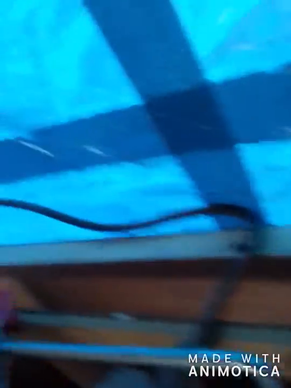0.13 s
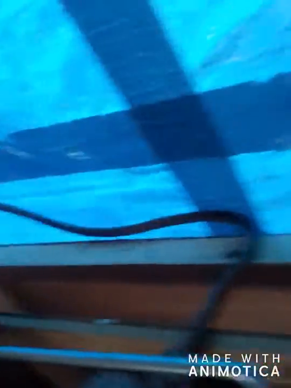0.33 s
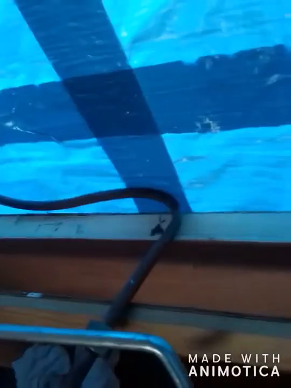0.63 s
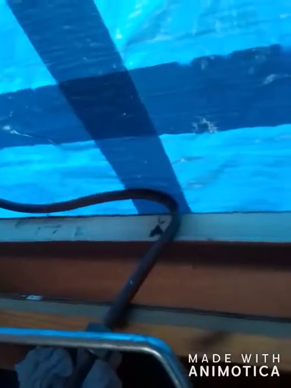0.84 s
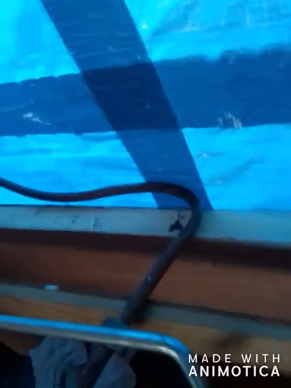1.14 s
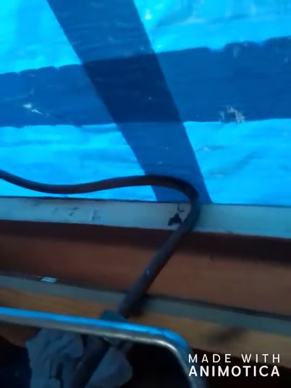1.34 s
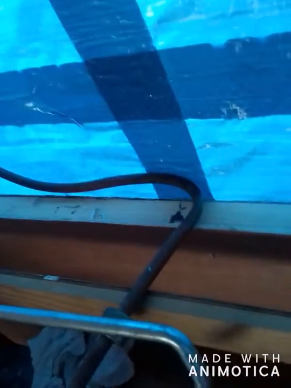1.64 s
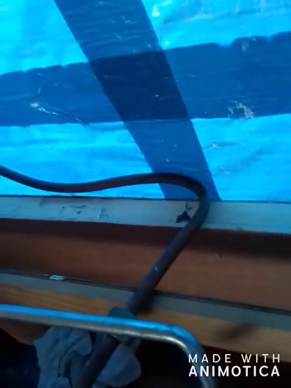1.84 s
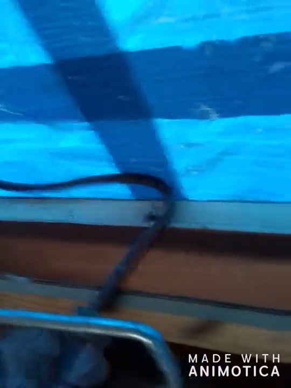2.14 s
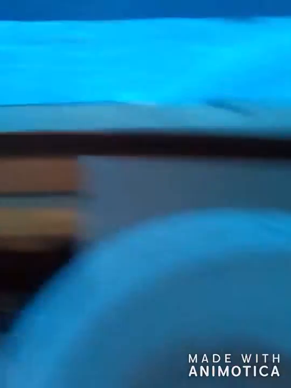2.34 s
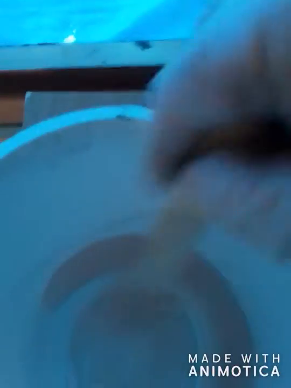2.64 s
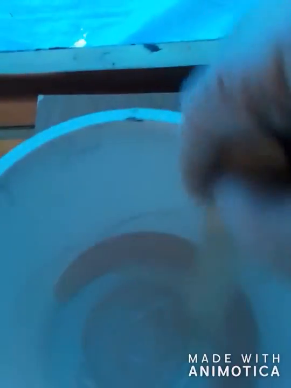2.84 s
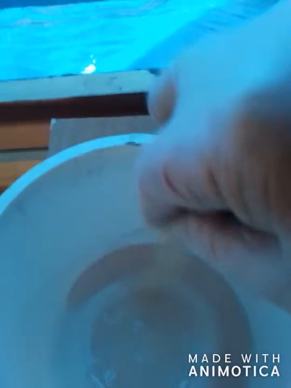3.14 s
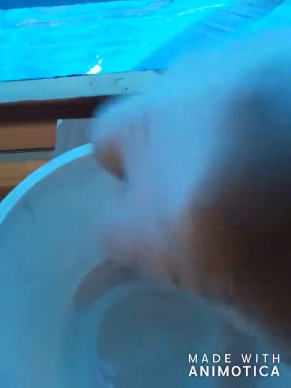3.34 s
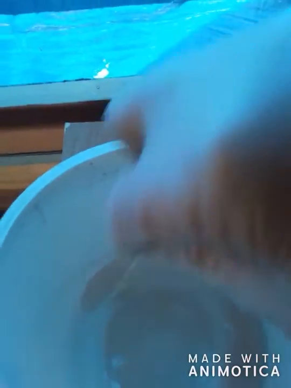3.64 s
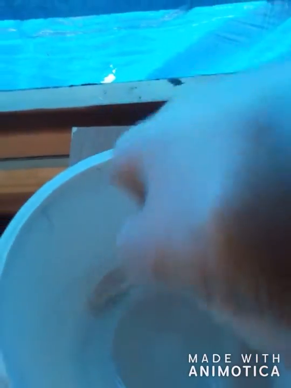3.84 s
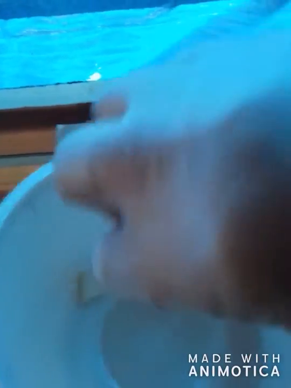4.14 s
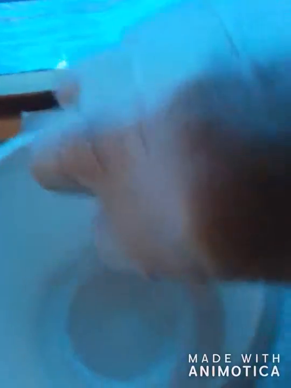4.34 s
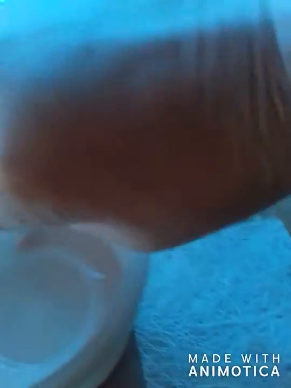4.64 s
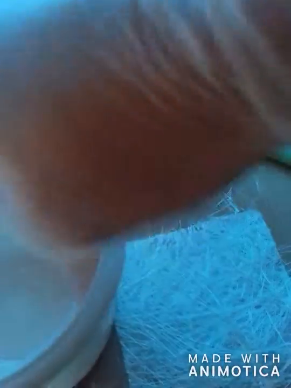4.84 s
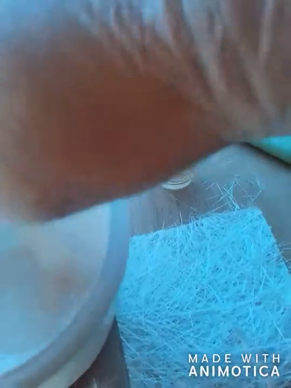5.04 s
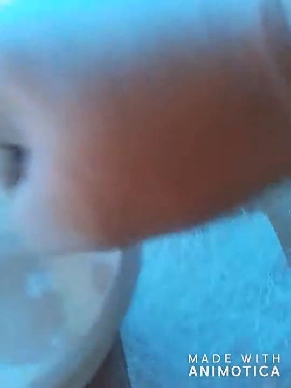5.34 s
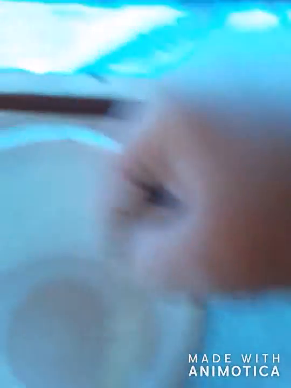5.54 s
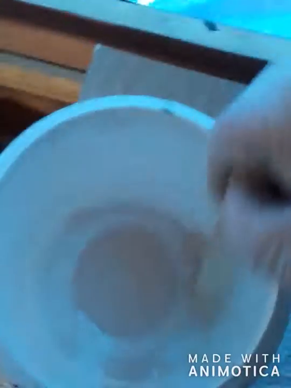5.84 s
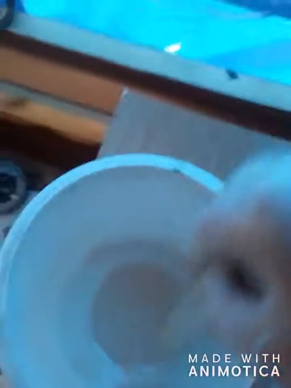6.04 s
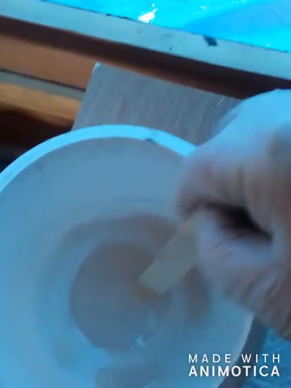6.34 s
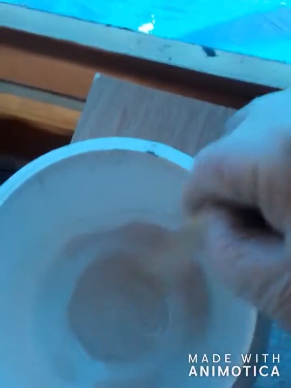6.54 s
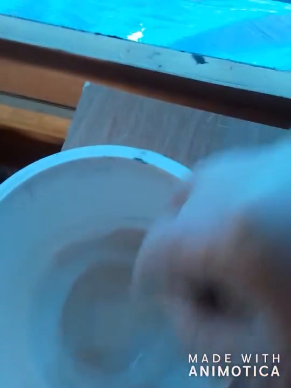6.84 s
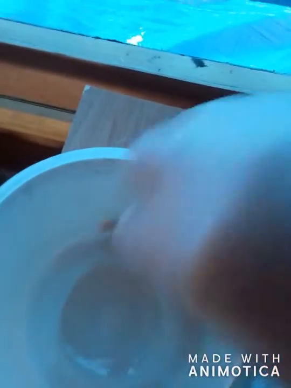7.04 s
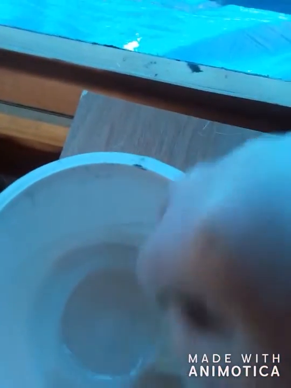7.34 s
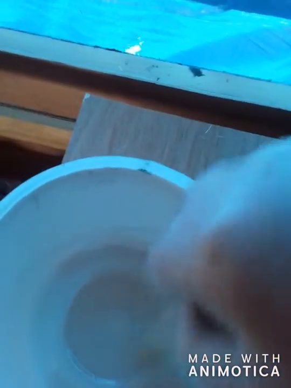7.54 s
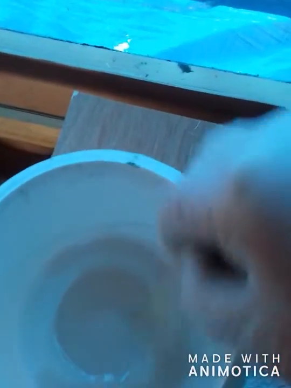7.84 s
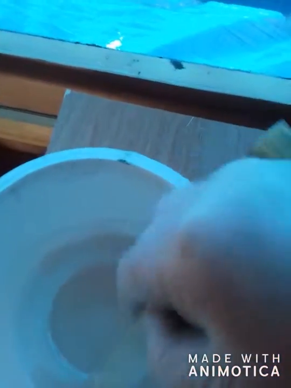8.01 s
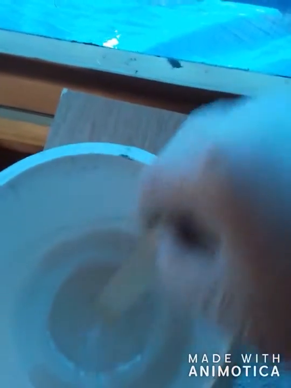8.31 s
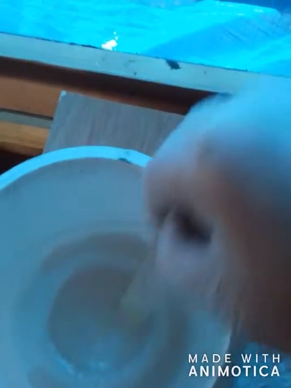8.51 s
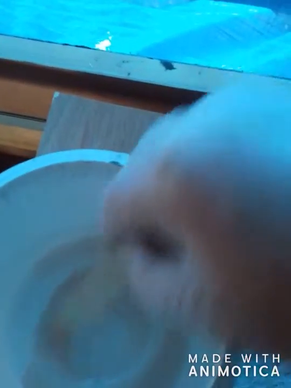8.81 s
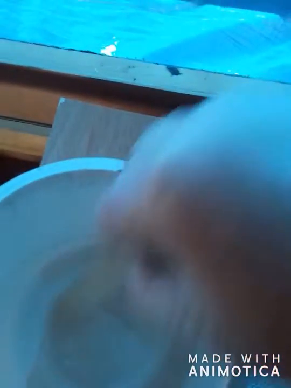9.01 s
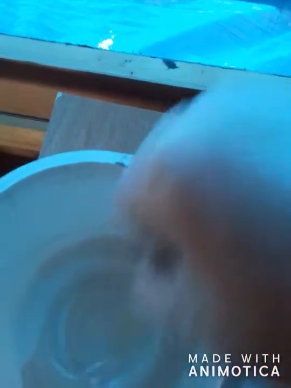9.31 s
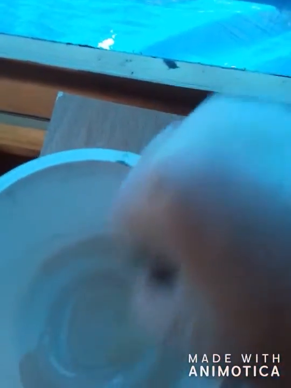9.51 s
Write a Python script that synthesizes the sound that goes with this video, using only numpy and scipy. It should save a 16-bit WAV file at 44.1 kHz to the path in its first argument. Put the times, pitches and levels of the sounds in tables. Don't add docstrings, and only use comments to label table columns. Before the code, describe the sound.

Stirring resin under a tarp: quick uneven clusters of woody taps on thin plastic, with gritty scraping and small wobbles on the bench. A brief lull, then the stick works in a deeper bucket, giving mostly gentler thuds and ticks, low rubbing rumble and soft wet slaps, with a few firmer clacks. The sound is dry and close, treble muffled, with faint hiss and quiet air behind.

```python
import sys
import numpy as np
from scipy import signal
from scipy.io import wavfile
from scipy.ndimage import uniform_filter1d

SR = 44100
rng = np.random.default_rng(int(sys.argv[2]) if len(sys.argv) > 2 else 0)


def file_out(sig):
    cols = np.atleast_2d(sig).T
    lim = np.clip(cols, -1, 1)
    pcm = np.round(lim * 32767).astype(np.int16)
    wavfile.write(sys.argv[1], SR, pcm)


def volts_from_db(level):
    exponent = np.asarray(level, float) / 20
    return 10 ** exponent


N = 426447
SWAP_S = 3.1

# f/Hz, level/dB, t60/s
CUP_MODES = [(417, -18, 0.092), (610, -4, 0.017), (631, 5, 0.021), (751, 0, 0.02), (1110, -9.5, 0.034),
             (1500, 7.5, 0.0057), (1802, 3, 0.047), (2480, 5, 0.02), (2900, -19, 0.0054),
             (3390, -15.5, 0.04), (4174, -11, 0.0022)]
# f/Hz, level/dB, t60/s
BUCKET_MODES = [(247, -11.5, 0.034), (391.7, -0.5, 0.063), (406.4, -1.5, 0.12), (473, 2, 0.032),
                (521, 4, 0.033), (614, 7.5, 0.028), (779.5, 1.5, 0.03), (1184, 5, 0.014),
                (1441, -3.5, 0.06), (1900, -6, 0.032), (2290, 4, 0.022), (2650, -20.5, 0.025),
                (3250, -11, 0.027), (4160, -51, 0.006)]
# f/Hz, level/dB
RASP_SPECTRUM = [(900, 2), (1300, 0.5), (1800, 3.5), (2400, -2.5), (3400, -4), (4400, -15.5), (5200, -7.5)]
# f/Hz, level/dB
RATTLE_SPECTRUM = [(400, -32), (900, 2.5), (2500, 2.5), (4300, -10.5), (5200, -19.5), (8000, -17)]
# f/Hz, level/dB
BENCH_SPECTRUM = [(30, -26.5), (60, -4.5), (115, 7), (155, -20), (205, -4), (280, 0.5), (400, -52)]
# f/Hz, level/dB
AIR_SPECTRUM = [(20, -30.5), (60, -2), (130, -7.5), (400, -2.3), (1300, -3), (2200, -11), (3500, -19),
                (5500, -36.5)]
# f/Hz, level/dB
TARP_SPECTRUM = [(2000, -30), (3200, -3.5), (4400, -2), (5000, -4.5), (6500, -8), (9000, -28)]
# f/Hz, gain/dB
HAND_SHADE = [(300, 0), (2800, .1), (3800, -2), (4600, -6), (5300, -3), (6500, 1)]
# f/Hz, gain/dB
MICROPHONE_RESPONSE = [(60, -17.5), (200, -3), (4500, 9), (5100, -3), (5600, -13), (6500, -17.5),
                       (8000, -26.5), (16000, -57)]
# f/Hz, level/dB
SIDE_SPECTRUM = [(40, -18), (150, -9.5), (600, -3), (2500, -1.5), (4200, -7), (5000, -38.5)]
# f/Hz, level/dB
HISS_SPECTRUM = [(5000, -4.5), (9300, -5), (10000, -14.5), (10700, -5.5), (14500, -6), (15000, -26),
                 (15400, -6.5), (15800, -3)]

# t/s, length/s, level/dB, start f/Hz, end f/Hz
WHISTLES = [
    (6.098, .035, -66, 2450, 2400),
    (7.29, .07, -58, 2800, 2500),
]
# t/s, length/s, level/dB, centre f/Hz, airy top over centre/dB
STROKES = [(0.175, 0.091, -33.5, 2720, -4), (1.142, 0.03, -42, 2920, -2.5), (1.19, 0.11, -43.5, 2480, -3),
           (3.99, 0.075, -60, 2840, -12), (4.332, 0.11, -62, 2800, -21), (4.728, 0.22, -59.5, 2770, -10.5),
           (5.702, .26, -62, 3530, 14), (7.262, 0.11, -52, 2900, 1), (8.291, 0.07, -48, 2800, -1),
           (1.913, 0.036, -53.5, 3600, 1), (2.052, 0.064, -58, 3500, -10.5), (0.579, 0.068, -53, 4000, -4),
           (5.863, 0.065, -53.5, 3000, -2), (5.931, 0.082, -60, 3500, -2), (6.87, 0.046, -61, 3700, -3),
           (8.072, 0.062, -54, 3700, -1), (3.47, .1, -58, 2700, -12), (5.43, .08, -58, 2700, -10),
           (.33, .08, -54, 4200, -4), (1.34, .09, -54, 4200, -6)]
# t/s, peak level/dB
WOBBLES = [
    (1.141, -38),
    (2.669, -39.5),
    (2.807, -37.5),
    (2.926, -39.5),
    (3.051, -47.5),
    (6.697, -37),
    (6.828, -44),
    (6.975, -35),
]
# t/s, peak level/dB, f/Hz
RESIN_SLAPS = [(4.6, -38, 606), (3.966, -44, 290), (6.1, -35, 610), (5.306, -44, 611), (7.2, -32, 593),
               (5.0465, -19, 680), (0.75, -30, 330), (6.792, -46, 520), (6.053, -28, 620),
               (6.312, -36, 640), (3.722, -36, 560), (3.42, -34, 360), (.112, -30, 330)]
# t/s, peak level/dB, f/Hz
GRIT_NICKS = [(0.3055, -36, 1780), (0.3454, -38, 1830), (0.626, -29, 2440), (1.063, -48, 2070),
              (1.1552, -24, 3490), (1.198, -35, 2440), (1.249, -25, 1830), (1.4024, -33, 2480),
              (1.463, -35, 1830), (1.8033, -28.5, 1740), (1.8924, -29, 1810), (2.0134, -30, 2900),
              (2.0572, -38, 2360), (2.2154, -37, 2840), (2.4798, -46, 3830), (2.4936, -37, 2370),
              (2.5324, -20, 2500), (2.7336, -31.5, 3870), (2.799, -37, 1740), (2.8838, -42, 2300),
              (2.9896, -44, 2580), (3.4994, -42, 1880), (3.6394, -51, 1760), (3.9994, -48, 1880),
              (4.3994, -50, 2100), (4.754, -42, 2360), (5.0499, -23.5, 2110), (5.0658, -24, 1990),
              (5.1077, -30, 2180), (5.4104, -33, 2380), (5.4994, -47, 3140), (5.6695, -31, 2450),
              (5.711, -32, 2560), (5.8834, -40, 2440), (5.8994, -40, 1860), (5.9744, -49, 2820),
              (6.098, -41, 2430), (6.644, -38, 1510), (6.823, -39, 2560), (6.8854, -49, 2290),
              (7.1144, -54, 2290), (7.277, -46, 3760), (7.828, -32, 1990), (8.2147, -39, 1860),
              (8.741, -44, 1550), (8.793, -41, 3280), (8.804, -35, 2400), (9.0922, -41, 1800),
              (9.209, -35, 2470), (9.2414, -42, 2320), (9.492, -38, 2000)]
# t/s, length/s, rasp level/dB, rumble over rasp/dB
WALL_DRAGS = [(0.0, .1, -58.5, 0), (0.102, 0.18, -46.5, -5.5), (0.307, 0.1, -47.5, 0),
              (0.421, 0.67, -53.5, -5), (1.32, 0.24, -49, -12.5), (1.798, 0.28, -52, -2),
              (2.125, 0.36, -52, -9.5), (2.507, 0.25, -48, -4), (2.789, 0.201, -52, -7),
              (2.986, 0.2, -63, -4.5), (3.442, 0.13, -55, -6.5), (3.595, 0.061, -60, -10),
              (3.832, 0.15, -62, -1), (4.232, .1, -63, -8), (4.586, 0.27, -56, 3.5),
              (5.188, 0.15, -65.5, 12.5), (5.409, 0.32, -61, 3.5), (5.6, 0.19, -52, 10),
              (6.063, 0.16, -86.5, 29.5), (6.51, 0.51, -59, 1.5), (7.113, 0.18, -64.5, 3),
              (7.225, 0.18, -64, -6), (7.46, 0.41, -66, 5.5), (7.823, 0.49, -60.5, 14.5),
              (8.307, 0.16, -59.5, 11.5), (8.512, 0.29, -64.5, 0), (8.674, 0.31, -55.5, 0.5),
              (9.09, 0.27, -56, -7.5), (9.377, 0.71, -58.5, -13)]
# t/s, click peak level/dB, thump over click/dB, contact t60/s
CUP_FLAT_BLOWS = [(.1077, -23, -1, 0.05), (.196, -47, 11.5, 0.18), (.3252, -52, 13.5, 0.07),
                  (.3965, -36, 3.5, 0.019), (.6704, -8, -6, 0.0086), (.7128, -21, -1.5, 0.016),
                  (.7781, -21, -1, 0.012), (.8001, -24, -15.5, 0.019), (.8325, -13.5, -7, 0.024),
                  (.9757, -15, -8.5, 0.02), (1.503, -32.5, 1.5, 0.01), (1.5798, -19.5, -0.5, 0.037),
                  (1.6172, -29.5, 1, 0.024), (1.6347, -10.5, -7, 0.019), (1.7981, -45, 18, 0.021),
                  (1.8302, -24.5, -1, 0.038), (1.8761, -20, 3, 0.038), (1.954, -23.5, 1, 0.029),
                  (2.0078, -36.5, 2, 0.029), (2.1006, -20.5, -2, 0.027), (2.2443, -27.5, -2.5, 0.027),
                  (2.2653, -29.5, -6.5, 0.009), (2.37, -22, 3, 0.024), (2.7851, -27.5, 1, 0.055),
                  (2.9627, -47, 7.5, 0.062)]
# t/s, click peak level/dB, thump over click/dB, contact t60/s
CUP_EDGE_BLOWS = [(.4359, -22.5, -5, 0.062), (.5257, -45, 10.5, 0.058), (.6604, -23, 1.5, 0.043),
                  (.8824, -10.5, -18, 0.018), (.9188, -31.5, -1, 0.063), (1.3269, -40, 11, 0.011),
                  (1.4204, -33, -10, 0.012), (1.4381, -27.5, 1.5, 0.012), (2.5222, -8.5, -9, 0.018),
                  (2.5875, -24, -9.5, 0.006), (2.7242, -33, 1, 0.072), (2.7762, -31.5, 5, 0.022)]
# t/s, click peak level/dB, stick f/Hz
CUP_TIP_TICKS = [(.1314, -22, 3130), (.4283, -36, 1130), (.5751, -26.5, 4560), (.619, -34, 2480),
                 (.7447, -34, 2480), (.7692, -25, 1810), (1.262, -38.5, 1900), (1.8183, -26, 1760),
                 (1.9864, -35.5, 2900), (2.1405, -29.5, 1850), (2.3231, -37.5, 2270), (2.4274, -40, 3650),
                 (2.6002, -31, 2650), (2.6399, -35, 2020), (2.7, -47, 2000), (2.9178, -42.5, 2580)]
# t/s, click peak level/dB, thump over click/dB, contact t60/s
BUCKET_EDGE_BLOWS = [(3.4181, -24, -4, 0.031), (3.9045, -39, 0, 0.022), (4.2914, -42.5, 2.5, 0.034),
                     (4.5955, -17.5, -10, 0.033), (4.658, -38, 5, 0.079), (5.047, -23, -2, 0.02),
                     (5.078, -35, 3, 0.08), (5.1136, -31.5, 1.5, 0.05), (5.1697, -36.5, 1.5, 0.063),
                     (5.6018, -29.5, -6, 0.059), (5.6311, -31.5, 2.5, 0.097), (5.6895, -33, -4, 0.056),
                     (5.7276, -34.5, 1.5, 0.056), (5.751, -32.5, -13, 0.023), (5.8074, -15, -9.5, 0.025),
                     (6.5886, -34.5, -3, 0.054), (6.775, -39.5, -2.5, 0.097), (7.267, -52, 14.5, 0.01),
                     (7.6559, -45, 5, 0.035), (7.8175, -35, -2.5, 0.13), (7.8424, -41, -10, 0.014),
                     (8.3536, -23, -2, 0.071), (8.5485, -34, 5.5, 0.016), (9.0463, -25.5, -10, 0.034),
                     (9.5214, -32, -4.5, 0.023)]
# t/s, click peak level/dB, thump over click/dB, contact t60/s
BUCKET_FLAT_BLOWS = [(3.7216, -33.5, -3, 0.12), (3.8444, -43.5, -8, 0.055), (4.245, -37, 5, 0.064),
                     (4.455, -64, 19, 0.035), (6.3874, -53, 9, 0.047), (6.7007, -51, 5, 0.16),
                     (6.7281, -43, 9, 0.051), (7.213, -27, -4, 0.025), (7.5593, -33, -4.5, 0.048),
                     (8.1492, -30, 5, 0.056), (8.2905, -28, -3.5, 0.067), (8.562, -31.5, -6.5, 0.1),
                     (8.6856, -26, -11, 0.033), (8.708, -47.5, 9, 0.063), (8.8392, -27, -3, 0.031),
                     (9.4157, -41, 0, 0.037)]
# t/s, click peak level/dB, thump over click/dB, contact t60/s
BUCKET_DEEP_BLOWS = [(5.4179, -37.5, -0.5, 0.0076), (5.6675, -39, -2, 0.11), (5.8306, -45, 10, 0.039),
                     (5.8635, -40.5, 9.5, 0.051), (6.0527, -28, 2.5, 0.057), (6.0638, -30.5, -5, 0.07),
                     (6.3119, -28, -6, 0.012), (6.4797, -46, 2, 0.078), (6.5042, -35, 6, 0.071),
                     (6.517, -38, 0, 0.16), (6.654, -36, -3, 0.022), (6.9284, -37.5, 5, 0.062),
                     (7.4901, -37.5, 2.5, 0.047), (7.7647, -43, 1.5, 0.05), (7.881, -37, -25, 0.054),
                     (7.8971, -31, 1, 0.044), (7.9478, -39.5, 2, 0.071), (7.9653, -24.5, -8, 0.1),
                     (8.0121, -30.5, 3.5, 0.077), (8.0674, -36, 3, 0.11), (8.1338, -23.5, -3, 0.05),
                     (8.1924, -39, 4, 0.054), (8.4928, -29.5, -1.5, 0.005), (8.8166, -33.5, 0.5, 0.005),
                     (9.1297, -42, 4, 0.012), (9.179, -34.5, -0.5, 0.062)]
# t/s, click peak level/dB, stick f/Hz
BUCKET_TIP_TICKS = [(3.617, -42.5, 1970), (4.5256, -36.5, 3180), (5.1505, -26, 2660), (5.3731, -28, 2960),
                    (7.14, -49, 2060), (7.3463, -42, 2490), (7.445, -42, 1820), (7.5027, -35.5, 1890),
                    (8.0568, -19.5, 2290), (8.382, -38, 1980), (8.8308, -32.5, 3650), (8.9397, -37.5, 3220),
                    (9.161, -40.5, 3280), (9.2994, -44, 2020), (9.3634, -36.5, 3600), (9.3729, -33, 1870),
                    (9.402, -34, 2400), (9.457, -44.5, 3700), (9.573, -37, 3900)]


def evened(x):
    return x / np.sqrt(np.mean(x ** 2) + 1e-20)


def read(points, hz):
    f, value = np.transpose(points)
    return np.interp(np.log(hz + 1), np.log(f + 1), value)


def add(mix, s, sound):
    part = mix[round(s * SR):][:len(sound)]
    part += sound[:len(part)]


def coloured(x, points):
    log_gain = np.log(volts_from_db(read(points, abs(np.fft.fftfreq(4096, 1 / SR)))))
    taps = np.fft.ifft(np.exp(np.conj(signal.hilbert(log_gain)))).real[:2048]
    return signal.oaconvolve(x, taps)[:len(x)]


def rings(modes, luck, spread, scatter_db):
    hz, db, t60_s = np.transpose(modes)[..., None]
    t = np.arange(3300) / SR
    shift, weight = luck[:2 * len(hz)].reshape(2, -1, 1)
    decay = volts_from_db(db + scatter_db * weight - 60 * t / t60_s)
    waves = decay * np.sin(2 * np.pi * hz * (1 + spread * shift) * t)
    low = hz[:, 0] < 900
    return waves[low].sum(0), waves[~low].sum(0)


def plain_rings(modes):
    return rings(modes, np.zeros(40), 0, 0)


def air():
    air_db = -67.5
    return volts_from_db(air_db) * evened(coloured(rng.standard_normal(N), AIR_SPECTRUM))


def tarp():
    rustle_db, swell_db, bucket_drop_db = -80, 5, 9
    t = np.arange(N) / SR
    waves = [np.sin(2 * np.pi * (hz * t + rng.random())) / np.sqrt(hz) for hz in (.3, 1.3, 3.7)]
    level_db = rustle_db + swell_db * evened(sum(waves)) - bucket_drop_db * (t > SWAP_S)
    return volts_from_db(level_db) * evened(coloured(rng.standard_normal(N), TARP_SPECTRUM))


def squeaks():
    out = np.zeros(N)
    for s, length_s, db, start_hz, end_hz in WHISTLES:
        u = np.linspace(0, 1, round(length_s * SR))
        fuzz = evened(uniform_filter1d(rng.standard_normal(len(u)), 300))
        turns = np.cumsum(start_hz + (end_hz - start_hz) * u) / SR
        add(out, s, volts_from_db(db) * (1 + fuzz) * np.sin(np.pi * u) ** .5 * np.sin(2 * np.pi * turns))
    return out


def swishes():
    out = np.zeros(N)
    for s, length_s, db, hz, top_db in STROKES:
        u = np.linspace(0, 1, round(length_s * SR))
        colour = [(0.36 * hz, -30), (0.18 * hz, -8), (hz, 0),
                  (4600, -5), (7000, top_db), (16000, top_db + 6.5)]
        grain, drift = rng.standard_normal((2, len(u)))
        clumps = volts_from_db(2.7 * evened(uniform_filter1d(drift, 120)))
        slips = grain * clumps * np.sin(np.pi * u ** 1.04) ** 1.02
        slips = np.pad(slips, (0, 2000))
        _, click = plain_rings(CUP_MODES if s < SWAP_S else BUCKET_MODES)
        wall = signal.fftconvolve(slips, click)[:len(slips)]
        rub = evened(coloured(slips, colour)) + volts_from_db(-9.5) * evened(wall)
        add(out, s, volts_from_db(db) * rub * np.sqrt(len(rub) / len(u) / 2))
    return out


def bumps():
    wobble_hz = 210.2
    out, t = np.zeros(N), np.arange(6000) / SR
    for s, db, hz in [(s, db, wobble_hz) for s, db in WOBBLES] + RESIN_SLAPS:
        rough = .7 + 0.3 * evened(uniform_filter1d(rng.standard_normal(len(t)), 300))
        overtone_db = -5.0 - 16 * (hz > 300)
        ring = np.sin(2 * np.pi * hz * t) + volts_from_db(overtone_db) * np.sin(2 * np.pi * 2 * hz * t)
        add(out, s, volts_from_db(db - 60 * hz * t / 40) * np.minimum(t / 0.0028, 1) * rough * ring)
    return out


def nicks():
    judder_end_s, judder_per_s, judder_db, judder_hz = 0.1, 120, -46.5, 3970
    t60_s, trim_db, dry_gain, rise_s = 0.015, -4.5, 0.43, 0.00086
    out, t = np.zeros(N), np.arange(1500) / SR
    judder = [(s, judder_db, judder_hz) for s in np.arange(.01, judder_end_s, 1 / judder_per_s)]
    for s, db, hz in GRIT_NICKS + judder:
        rough, scratch = rng.standard_normal((2, len(t)))
        ring = (1 + evened(uniform_filter1d(rough, size=30))) * np.sin(2 * np.pi * hz * t)
        ring += dry_gain * np.diff(scratch, prepend=0)
        add(out, s - .0005, volts_from_db(db + trim_db - 60 * t / t60_s) * np.minimum(t / rise_s, 1) * ring / 2)
    return out


def drag_forces():
    bite_s, lift_s, slowing_db = 0.0091, 0.03, -7
    press, weight = np.zeros(N), np.zeros(N)
    for s, length_s, rasp_db, rumble_db in WALL_DRAGS:
        u = np.arange(0, length_s + 4 * lift_s, 1 / SR)
        lift_db = -20 * np.maximum(u - length_s, 0) / lift_s
        stroke = np.minimum(u / bite_s, 1) * volts_from_db(rasp_db + slowing_db * u / length_s + lift_db)
        add(press, s, stroke)
        add(weight, s, stroke * volts_from_db(rumble_db + 3))
    return press, weight


def tip_slips():
    drift = uniform_filter1d(uniform_filter1d(rng.standard_normal(N), 250), 250)
    clumps = volts_from_db(2.8 * evened(drift))
    slips_per_s, catches_per_s = 6000, 200
    sizes = rng.standard_normal(N) * volts_from_db(2.8 * rng.exponential(1, N))
    slips = clumps * sizes * (rng.random(N) < slips_per_s / SR)
    return slips + 2.5 * clumps * rng.standard_normal(N) * (rng.random(N) < catches_per_s / SR)


def scrape():
    in_cup = np.arange(N) / SR < SWAP_S
    press, weight = drag_forces()
    slips = tip_slips()
    cup, bucket = ([signal.oaconvolve(slips, response)[:N] for response in plain_rings(modes)]
                   for modes in (CUP_MODES, BUCKET_MODES))
    rumble, ring = (np.where(in_cup, evened(a), evened(b)) for a, b in zip(cup, bucket))
    dry = evened(coloured(slips, [(500, -50.0)] + RASP_SPECTRUM))
    fizz = evened(np.diff(dry, 2, prepend=[0, 0])) * in_cup
    rasp = evened(dry + volts_from_db(-8.5) * ring) + volts_from_db(-13) * fizz
    rumble = rumble + volts_from_db(-6.5) * evened(coloured(slips, BENCH_SPECTRUM))
    return press * rasp + weight * rumble


def ticks(rows):
    thump_db, t60_s = -14, 0.034
    return [(s, db, thump_db, hz, t60_s) for s, db, hz in rows]


def blows(rows, stick_hz):
    return [(s, db, thump_db, stick_hz, t60_s) for s, db, thump_db, t60_s in rows]


def knocks(rows, modes, spread, stick_db, crack_db, chatter, tail_db, tail_s, bench_db, rattle_db):
    blow_s, touch_gain, touch_s = 0.0013, .35, .00012
    out, rattles, tails, shakes = np.zeros((4, N))
    t = np.arange(8000) / SR
    for s, db, thump_db, hz, t60_s in rows:
        luck, noise, crack, echoes = rng.standard_normal((4, len(t)))
        fade = volts_from_db(-60 * t / np.clip(t60_s, .008, .3))

        roughness = chatter * (t60_s / 0.02) ** 0.71 * volts_from_db(-.25 * (db + 28.5))
        contact = roughness * noise * abs(noise) * np.minimum(t / 0.00071, 1)
        contact += luck * (t / blow_s) * np.exp(-t / blow_s) / 2
        contact += touch_gain * np.exp(-t / touch_s)

        thump, click = rings(modes, luck, spread, scatter_db=2)
        thump *= np.minimum(t[:len(thump)] / 0.0038, 1)
        u = t[:len(click)]
        click += volts_from_db(stick_db - 60 * u / .008) * np.sin(2 * np.pi * hz * u)
        click = signal.fftconvolve(click / abs(click).max(), contact * fade)
        click[:len(t)] += volts_from_db(crack_db) * np.diff(crack, prepend=0) * fade
        thump = signal.fftconvolve(thump, contact * fade ** 0.83)
        thump -= uniform_filter1d(thump, size=120)
        knock = click / abs(click).max() + volts_from_db(thump_db) * thump / abs(thump).max()

        add(out, s - .0007, volts_from_db(db) * knock)
        clatter = fade * np.minimum(t / 0.00086, 1) * echoes * abs(noise)
        add(rattles, s, volts_from_db(db + rattle_db) * clatter)
        add(tails, s, volts_from_db(db + tail_db - 60 * t / tail_s) * echoes * abs(luck))
        add(shakes, s, volts_from_db(db + thump_db + bench_db - 60 * t / 0.41) * luck)
    out += coloured(rattles, RATTLE_SPECTRUM)
    out += coloured(tails, [(250, -41.0), (500, 15.0)] + RASP_SPECTRUM)
    return out + coloured(shakes, BENCH_SPECTRUM)


def stick_knocks():
    flat_hz, edge_hz, deep_hz = 1756, 2365, 1336
    cup_rows = blows(CUP_FLAT_BLOWS, flat_hz) + blows(CUP_EDGE_BLOWS, edge_hz) + ticks(CUP_TIP_TICKS)
    bucket_rows = blows(BUCKET_EDGE_BLOWS, edge_hz) + blows(BUCKET_FLAT_BLOWS, flat_hz)
    bucket_rows += blows(BUCKET_DEEP_BLOWS, deep_hz) + ticks(BUCKET_TIP_TICKS)
    cup = knocks(cup_rows, CUP_MODES, spread=0.033, stick_db=13.0, crack_db=-14.5, chatter=0.12,
                 tail_db=-15.5, tail_s=0.14, bench_db=-24.0, rattle_db=-12.5)
    bucket = knocks(bucket_rows, BUCKET_MODES, spread=0.07, stick_db=12.0, crack_db=-13.5, chatter=0.092,
                    tail_db=-16.5, tail_s=0.3, bench_db=-3.5, rattle_db=-12.5)
    return cup + bucket


def scene():
    mix = air() + tarp() + squeaks() + swishes() + bumps() + nicks() + scrape() + stick_knocks()
    swap = round(SWAP_S * SR)
    mix = np.r_[mix[:swap], coloured(mix, HAND_SHADE)[swap:]]
    return np.tile(mix, (2, 1))


def roll_off(x):
    return signal.sosfilt(signal.butter(12, 15770, fs=SR, output="sos"), x)


def record(dry):
    side_db, hiss_db, offset = -71.5, -73.5, -.0006
    mono = coloured(dry[0], MICROPHONE_RESPONSE)
    level_db = 10 * np.log10(abs(uniform_filter1d(mono ** 2, 900)) + 1e-8)
    side = evened(coloured(rng.standard_normal(N), SIDE_SPECTRUM))
    side *= volts_from_db(side_db + .15 * (level_db + 53.5))
    side *= np.clip((-40.0 - level_db) / 3, 0, 1)
    swell = volts_from_db(hiss_db + 0.16 * (level_db + 45.0))
    colour = [(1000, -54.5)] + HISS_SPECTRUM + [(15900, -74)]
    hiss = [swell * evened(coloured(rng.standard_normal(N), colour)) for _ in dry]
    both = mono + np.array([side, -side]) + hiss + offset
    return roll_off(both)


dry = scene()
out = record(dry)
file_out(out)
```